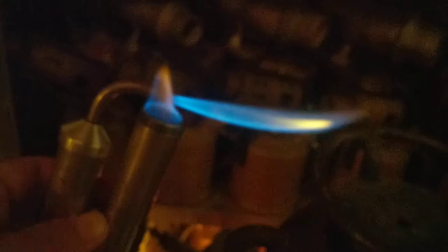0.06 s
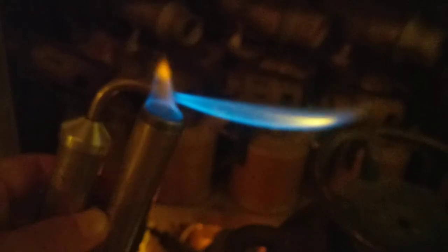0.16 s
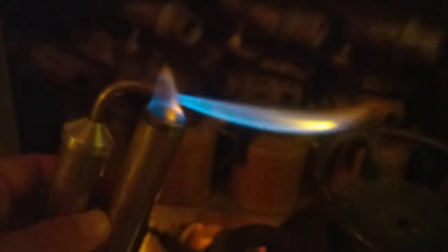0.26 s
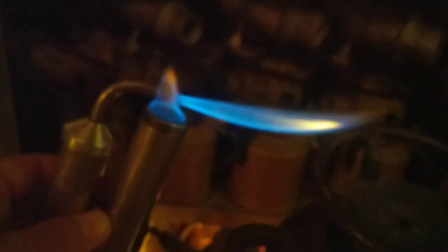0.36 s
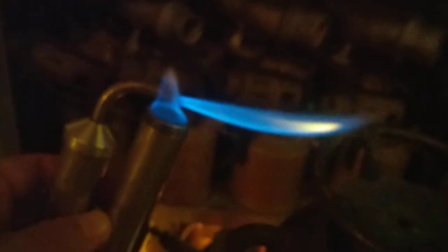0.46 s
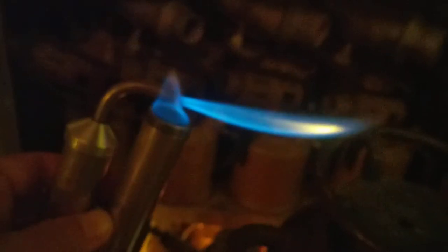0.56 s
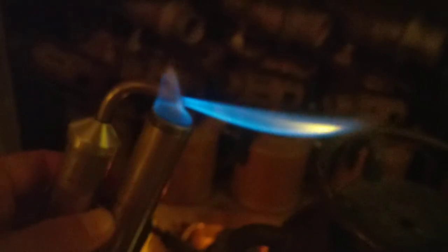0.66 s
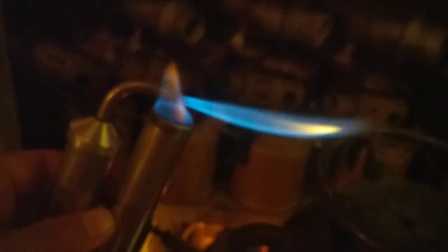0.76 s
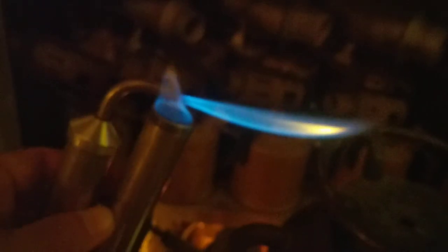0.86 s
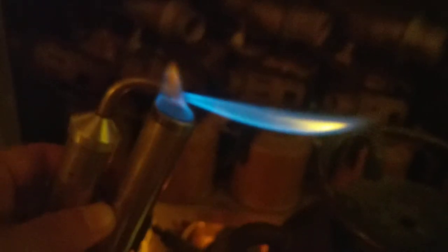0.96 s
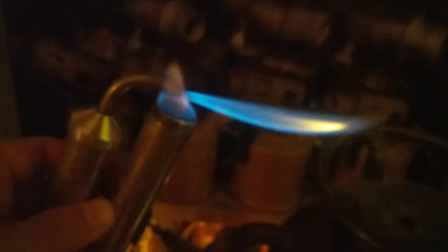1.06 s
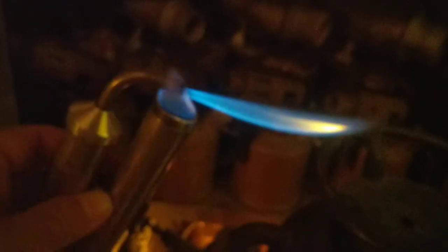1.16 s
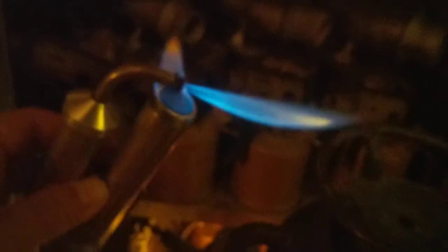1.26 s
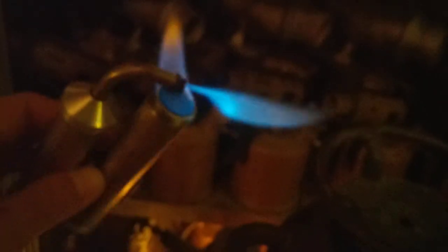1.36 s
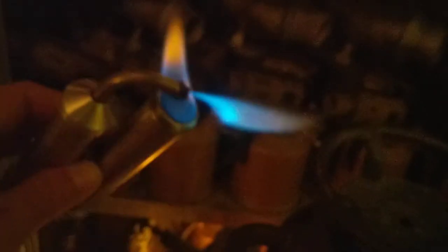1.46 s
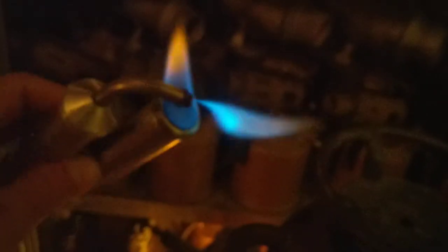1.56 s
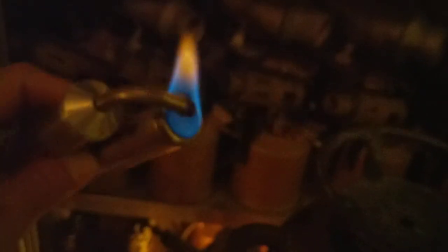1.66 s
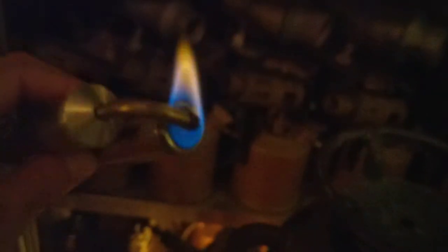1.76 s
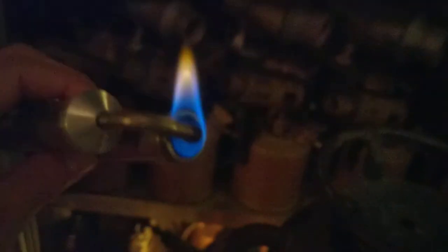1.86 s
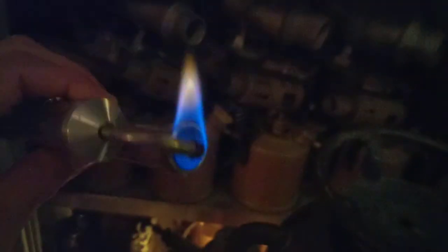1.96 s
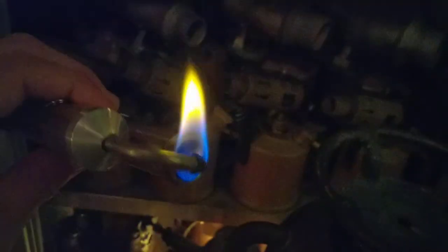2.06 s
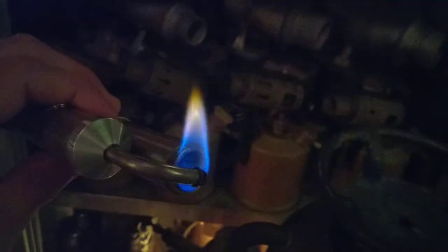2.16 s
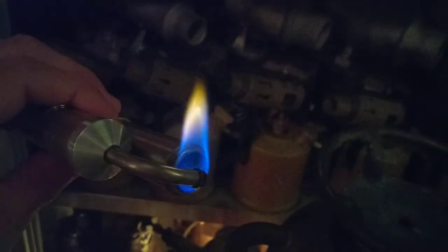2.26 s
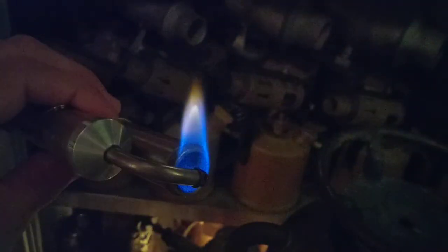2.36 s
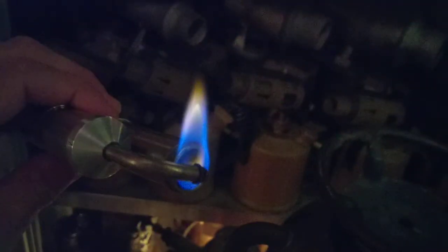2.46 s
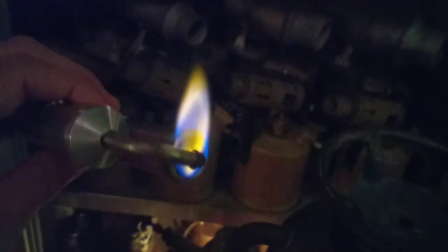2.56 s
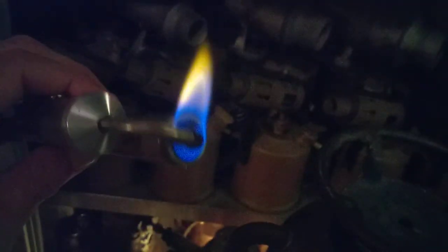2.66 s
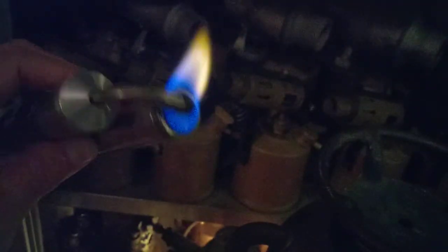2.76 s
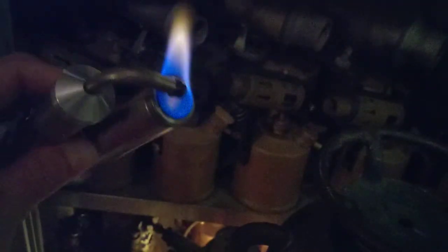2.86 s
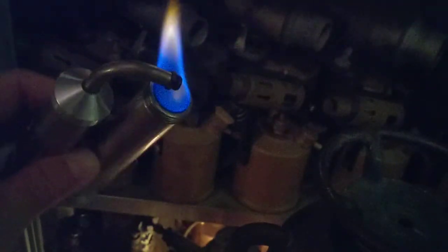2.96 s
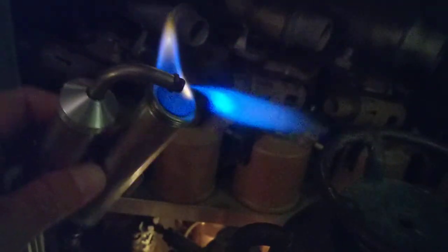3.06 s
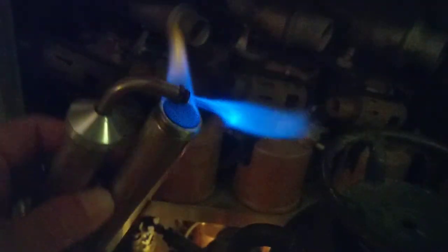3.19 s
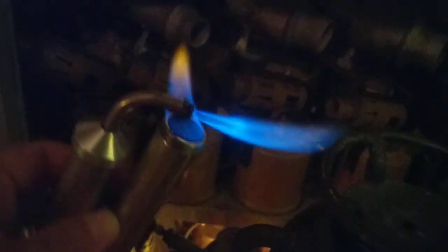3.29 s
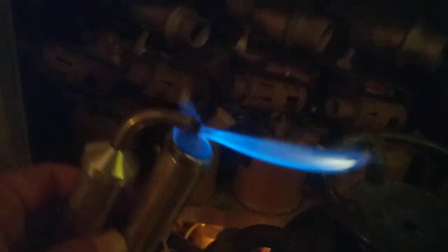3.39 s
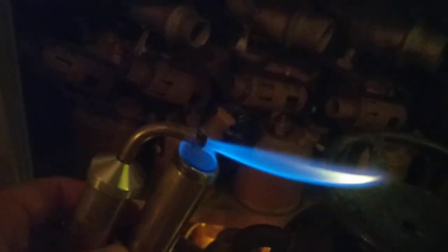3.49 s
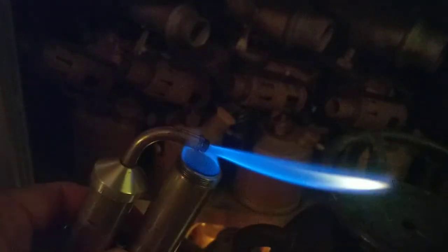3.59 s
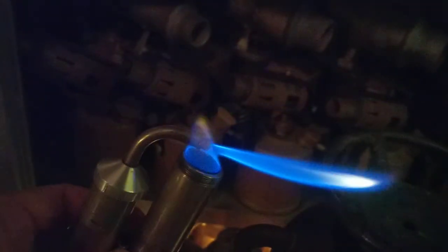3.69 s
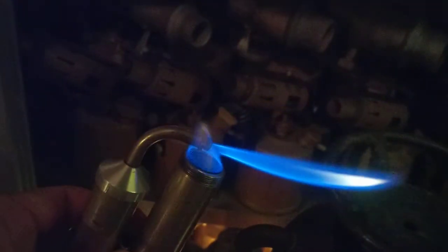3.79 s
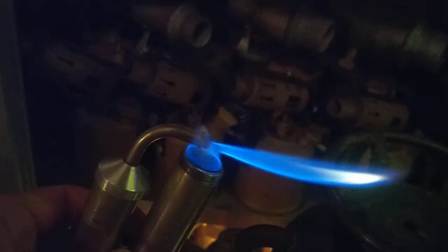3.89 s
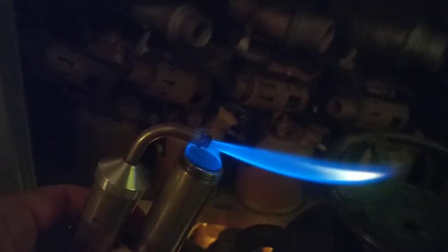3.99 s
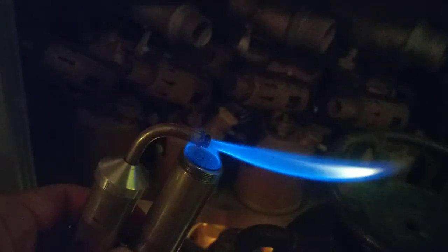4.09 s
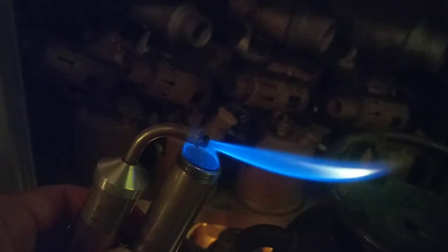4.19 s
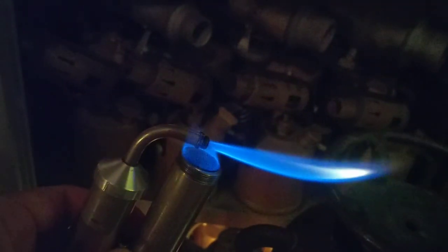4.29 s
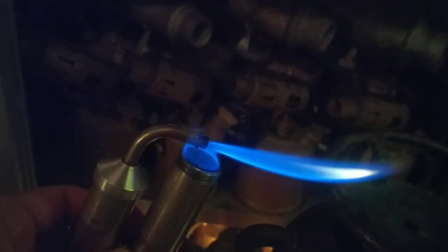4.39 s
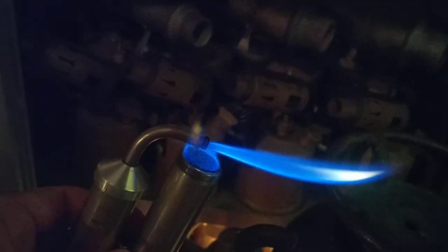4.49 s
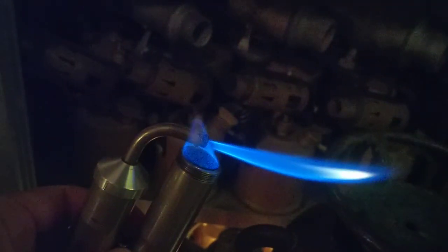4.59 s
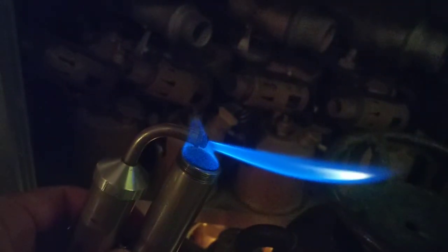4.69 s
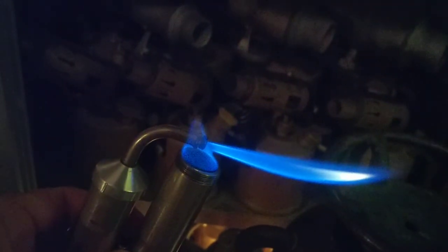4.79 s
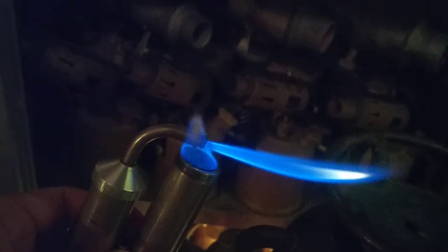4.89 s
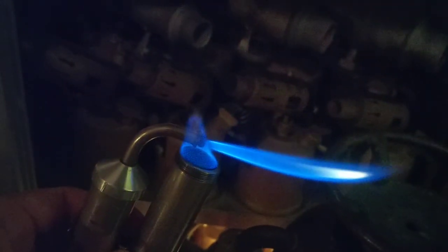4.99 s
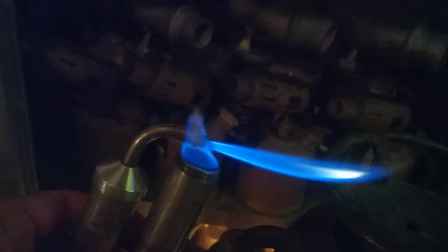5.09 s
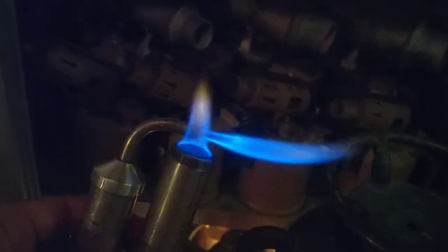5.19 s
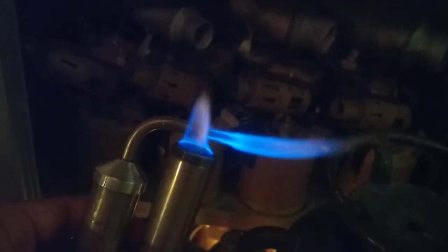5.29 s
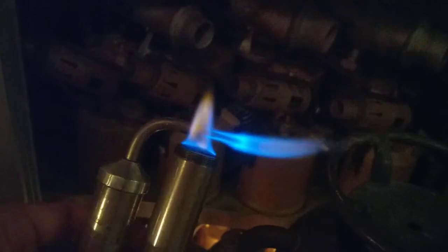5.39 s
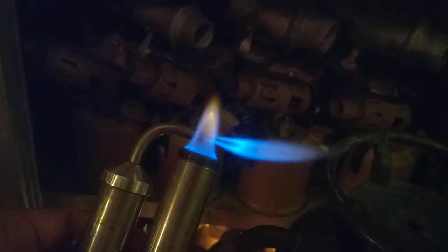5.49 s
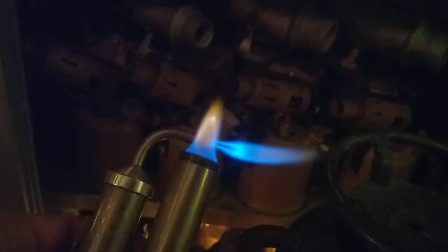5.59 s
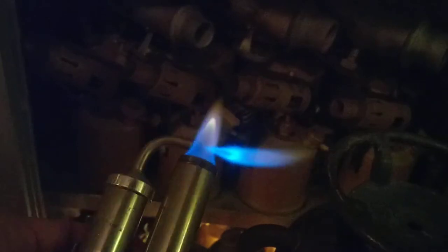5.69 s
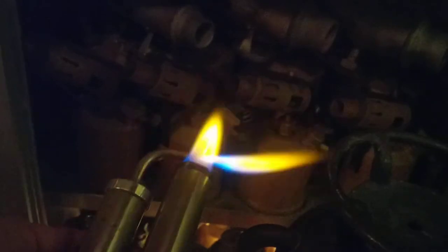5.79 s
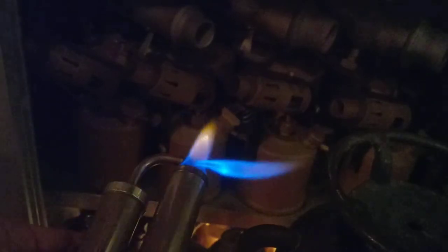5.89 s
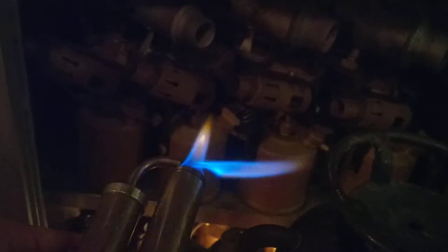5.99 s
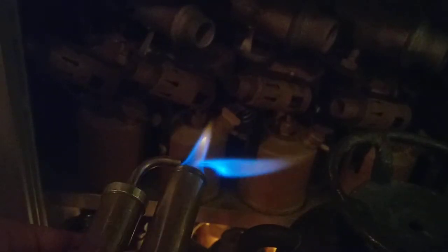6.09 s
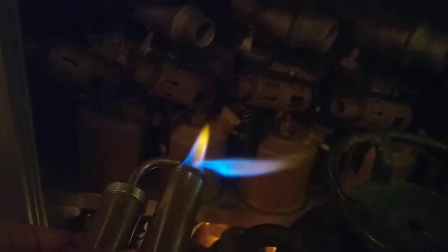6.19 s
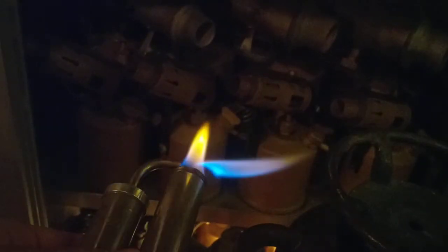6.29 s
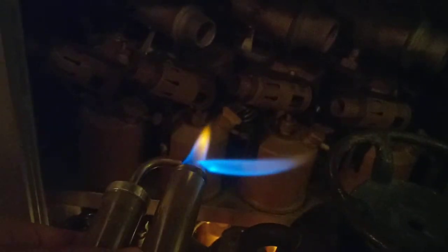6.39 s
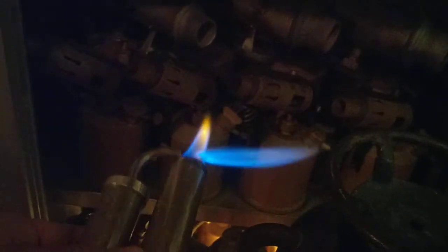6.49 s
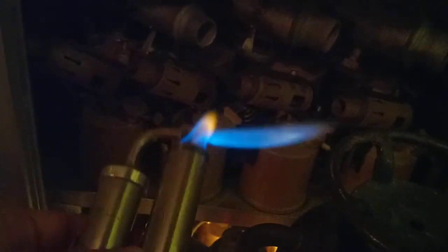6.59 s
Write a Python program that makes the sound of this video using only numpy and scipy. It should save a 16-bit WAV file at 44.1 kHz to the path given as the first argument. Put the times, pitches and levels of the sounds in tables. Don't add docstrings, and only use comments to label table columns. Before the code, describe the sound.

Close stereo sound of a small blow lamp in a quiet workshop, slightly earlier at the left, with short diffuse bench reflections and faint low room air. From 0 to 1.2 s a steady bright hiss lies over a soft flame murmur. At about 1.3 s the flame lifts into a rough, fluttering low-mid roar, strongest from 1.4 to 1.63 s, then cuts off abruptly. Weak hiss thins to near silence by 1.9 s; a loud, very short bright metal tick snaps at 2.04 s. Faint hiss puffs return around 2.5 and 2.95 s with tiny ticks. At 3.08 s it relights with a hard pop and quick gusts until 3.3 s, with a small pop near 3.5 s. Calm hissing continues to 5.2 s. Ragged roars follow, strongest from 5.3 to 5.9 s, with sharp pops at 5.33, 5.86 and 6.23 s and a bright spit at 5.9 s. Shorter gusts weaken toward 6.6 s.

```python
import sys
import numpy as np
from scipy import signal
from scipy.fft import rfft, irfft, next_fast_len
from scipy.io import wavfile
from scipy.ndimage import uniform_filter1d, map_coordinates

SR = 44100
rng = np.random.default_rng(int(sys.argv[2]) if len(sys.argv) > 2 else 0)


def boost_factor(decibels):
    exponent = np.asarray(decibels, float) / 20
    return 10 ** exponent


def wav_record(signal):
    frames = np.transpose(np.atleast_2d(signal))
    bounded = np.clip(frames, -1, 1)
    quanta = np.round(bounded * 32767).astype(np.int16)
    wavfile.write(sys.argv[1], SR, quanta)


N = 293247


def unit(x):
    return x / np.sqrt(np.mean(x ** 2) + 1e-20)


def along(points, hz):
    f, v = np.transpose(points)
    return np.interp(np.log(hz + 1), np.log(f + 1), v)


def curves(rows, t):
    s, *cols = np.transpose(rows)
    return [np.interp(t, s, c) for c in cols]


def power_sum_db(power):
    return 10 * np.log10(power)


def wobble(rate):
    return map_coordinates(rng.standard_normal(int(N * rate / SR) + 4), [np.arange(N) * rate / SR])


def coloured(x, spectrum):
    m = next_fast_len(N + 8192)
    gain = boost_factor(along(spectrum, np.fft.rfftfreq(m, 1 / SR)))
    return irfft(rfft(x, m) * gain, m)[..., :N]


def patchy(patch_db, channels=1):
    z = signal.stft(rng.standard_normal((channels, N)), nperseg=512)[2]
    field = uniform_filter1d(rng.standard_normal(z.shape[1:]), size=6, axis=0)
    field = uniform_filter1d(field, size=10, axis=1)
    return signal.istft(z * boost_factor(patch_db * unit(field)), nperseg=512)[1][:, :N]


def workshop():
    # pitch_hz, level_db
    air_spectrum = [(25, -23), (50, 2), (100, -0.5), (300, -6), (800, -14), (1500, -18.5), (2600, -25),
                    (3600, -26.5), (5000, -21), (7000, -20.5), (9000, -17.5), (10400, -20.5), (11200, -22),
                    (15000, -22.5)]
    a, b, c = coloured(patchy(patch_db=1.4, channels=3), air_spectrum)
    shared = coloured(c, [(40, -2), (150, -2), (400, -12), (1500, -16), (3400, 2.5), (7000, -7), (9000, -16)])
    return boost_factor(-50.0) * unit(np.array([a + shared, b + shared]))


def ticks():
    # start_s, snap_db, pitch_hz, rattle_db
    snaps = [
        (2.0359, -20.5, 7250, -46),
        (2.492, -46, 5000, -60.5),
        (2.868, -50, 7000, -62),
        (5.9068, -44, 8500, -41),
    ]
    out, t = np.zeros(N + SR), np.arange(900) / SR
    for start_s, snap_db, pitch_hz, rattle_db in snaps:
        snap = np.sin(2 * np.pi * pitch_hz * t) * boost_factor(snap_db - 60 * t / 0.00055)
        rattle = np.diff(rng.standard_normal(len(t) + 1)) * boost_factor(rattle_db - 60 * t / 0.036)
        out[round(start_s * SR):][:len(t)] += snap + rattle
    return coloured(out[:N], [(1500, 0), (3000, 2.5), (10000, 2.5), (14000, -5)])


def pops():
    # start_s, peak_db, gas_push (0-1)
    front_dips = [
        (1.51, -36, 0.2),
        (3.0794, -21.5, 0.5),
        (3.487, -40, 0.2),
        (5.325, -33, 0.5),
        (5.697, -48, 0.1),
        (5.761, -47, 0),
        (5.803, -46, 0.2),
        (5.8621, -30, 0.1),
        (6.2251, -26, 0.2),
        (6.498, -36, 0.4),
    ]
    out, t = np.zeros(N + SR), np.arange(-200, 3000) / SR
    dip = 0.22 * np.exp(-(t / 0.0014) ** 2) - 1.47 * np.exp(-(t / 0.00073) ** 2)
    push = (t > 0) * np.sin(2 * np.pi * 65 * t) * boost_factor(-60 * np.abs(t) / 0.088)
    for start_s, peak_db, gas_push in front_dips:
        out[round(start_s * SR) - 200:][:len(t)] += boost_factor(peak_db) * (dip + gas_push * push)
    return out[:N]


def dips(rate, spread_db, top_db):
    draw = rng.random((2, N))
    size_db = np.minimum(-spread_db * np.log(1 - draw[1]), top_db)
    return unit(-1.0 * (draw[0] < rate / SR) * boost_factor(size_db))


def surges(t, fades):
    # start_s (full strength), hold_s, roar_db, fade_db_per_s
    lift_offs = [(1.297, 0.023, -38.5, 300), (1.333, 0.064, -33, 300), (1.431, .2, -30, 900),
                 (3.08, 0.054, -35.5, 174), (3.183, 0.069, -34.5, 200), (3.291, 0.027, -35, 150),
                 (3.477, 0.0077, -49, 312), (5.197, 0.016, -34, 262), (5.324, 0.17, -34.5, 300),
                 (5.498, 0.1, -33.5, 300), (5.636, 0.26, -34, 27), (6.044, .04, -39.5, 200),
                 (6.128, 0.098, -35, 60), (6.324, 0.04, -38, 120), (6.46, 0.052, -39.5, 300.5),
                 (6.563, 0.074, -48.5, 196)]
    rise_db_per_s, relight_s, catch_s = 606, 3.075, 0.06
    power = 0
    for start_s, hold_s, roar_db, fade_db_per_s in lift_offs:
        swell_db = rise_db_per_s * np.clip(start_s - t, 0, 1)
        fade_db = fades * fade_db_per_s * np.clip(t - start_s - hold_s, 0, 1)
        power = power + boost_factor(2 * (roar_db - swell_db - fade_db))
    return power * ((t < relight_s - catch_s) | (t > relight_s))


def flame():
    # time_s, hiss_db (nozzle pressure), murmur_db (seated flame)
    jet = [(0, -53, -51), (1.27, -54, -53.5), (1.63, -49.5, -49), (1.68, -57.5, -65), (1.85, -59, -65.5),
           (1.93, -78, -73), (2.3, -76, -73), (2.48, -58, -75), (2.72, -68, -71), (2.95, -58.5, -67),
           (3.06, -57, -68), (3.08, -53, -56), (3.5, -55, -55.5), (4.4, -54, -55.5), (5.05, -58.5, -56),
           (5.9, -57.5, -48), (6.2, -55.5, -54), (6.65, -66.5, -73)]
    # pitch_hz, level_db (per Hz)
    roar_spectrum = [(30, -36), (80, -12), (150, -8), (280, -3), (450, -3.5), (700, -7.5), (1000, -10.5),
                     (1500, -17.5), (3000, -31.5), (6000, -104)]
    body_spectrum = [(300, -38), (800, 2.5), (1400, 1), (2500, -3.5), (4000, -2), (5500, -2.5), (7500, -10),
                     (10000, -20)]
    hiss_spectrum = [(2500, -30), (4500, -1), (6200, -7.5), (8000, -4.5), (10200, -7), (11500, -14.5),
                     (14000, -19.5), (16000, -25)]
    t = np.arange(N) / SR
    pressure_db, seated_db = curves(jet, t)
    low = surges(t, fades=1)
    high = surges(t, fades=2.2)
    roar_db = power_sum_db(boost_factor(2 * seated_db) + low)
    body_db = power_sum_db(boost_factor(2 * (seated_db - 3)) + high * boost_factor(2 * -17.5))
    hiss_db = power_sum_db(boost_factor(2 * pressure_db) + high * boost_factor(2 * -22))
    lifted = np.clip((roar_db + 52.5) / 8, 0, 1) * 0.83
    front = dips(rate=800, spread_db=3, top_db=8)
    flutter = lifted * (0.7 * wobble(9) + 0.8 * wobble(40))

    def blend(share, spectrum):
        pockets = unit(coloured(front, spectrum))
        smooth = unit(coloured(patchy(patch_db=1.0)[0], spectrum))
        return share * pockets + np.sqrt(1 - share ** 2) * smooth

    roar = boost_factor(roar_db + 0.5 + flutter) * blend(lifted, roar_spectrum)
    body_db = body_db + 5.5 + 0.8 * flutter + 1.3 * lifted * wobble(20)
    body = boost_factor(body_db) * blend(0.59 * lifted, body_spectrum)
    hiss_db = hiss_db + 3.5 + 1.1 * flutter + 0.76 * wobble(10.0)
    hiss = boost_factor(hiss_db) * unit(coloured(patchy(patch_db=0.26)[0], hiss_spectrum))
    return roar + body + hiss


def bench(x, t60, count):
    t, step = np.arange(SR // 8) / SR, N // count + 1
    padded, out = np.pad(x, (step, 2 * step)), np.zeros((2, N + 4 * step + SR))
    window = np.sin(np.pi * np.arange(2 * step) / (2 * step))
    for k in range(count + 1):
        piece = padded[k * step:][:2 * step] * window
        tail = rng.standard_normal((2, len(t))) * boost_factor(-60 * t / t60)
        tail = tail / np.linalg.norm(tail, axis=1, keepdims=True)
        echo = signal.fftconvolve(piece[None], tail, axes=1)
        out[:, k * step:][:, :echo.shape[1]] += echo
    return out[:, step:step + N]


def humps(table, hz):
    return sum(db * np.exp(-((hz - c) / w) ** 2) for c, w, db in table)[:, None]


def ports(lamp, close, air):
    # time_s, nozzle_turn (0-1), bass_tilt_db (per octave, flame size), left_minus_right_db
    pose = [(0, 0, 1, 1), (1.3, 0.6, -0.13, 0.5), (2.5, 0.7, 5, 0.5), (3.2, 0.7, 1, 1), (3.7, 0.8, 1, 0),
            (4.3, 1, 1.5, 0), (5.1, 0.4, 0.8, 0), (5.6, 0.35, 0, 0), (6, 0.35, 1.5, 0.5), (6.65, 0, -1, -1)]
    # time_s, lead_us
    lead_path = [(0, 144), (1.2, 144), (1.55, 123), (1.8, 138), (3, 140), (3.2, 124), (3.5, 128), (5, 127),
                 (5.5, 117), (6, 105), (6.65, 112)]
    # pitch_hz, angle_rad
    twist = [(1500, 0), (1850, .2), (2150, 1.1), (2450, -.1), (2800, -.3), (3300, .35), (3800, .9),
             (4500, 1.3), (5100, .2), (5500, 0)]
    # pitch_hz, likeness (0-1)
    direct = [(100, 0.98), (500, 1), (1200, 0.85), (2100, 0.72), (2700, 0.6), (3400, .62), (4400, 0.72),
              (5000, 0.2), (6000, 0.6), (8000, 0.2), (9000, 0)]
    # pitch_hz, width_hz, level_db
    whistles = [
        (6400, 230, 4.5),
        (7900, 570, 6.5),
    ]
    # pitch_hz, width_hz, level_db
    surfaces = [(577, 90, 5), (785, 29, 4.5), (1068, 12, 10), (1220, 24, 6), (1447, 60, 4.5), (1662, 39, 6),
                (2520, 86, 3), (3154, 360, 0.5), (4630, 270, -1)]
    # pitch_hz, level_db
    left_colour = [(600, -3), (1400, -7), (1950, -3), (2500, 8), (3000, 3.5), (4000, -1), (4600, -0.5),
                   (5500, -1.5), (6000, 1), (7000, 5.5), (8000, 3), (10000, 3.5), (12000, -4)]
    right_colour = [(600, -2), (950, -4), (1100, -4), (1400, -6.5), (2000, 1.5), (2650, 5), (3200, 6.5),
                    (4200, 1), (5050, -16), (5800, -2), (8000, -2.5), (8600, -4), (10000, -2),
                    (12000, -6.5)]
    echoes = bench(lamp + 0.4 * close, t60=0.14, count=50)
    hz, t, heard = signal.stft(np.vstack([lamp, close, echoes, air]), SR, nperseg=1024)
    near, tick, echo_pair, air_pair = heard[0], heard[1], heard[2:4], heard[4:]
    (lead_us,), (turn, tilt_db, pan_db) = curves(lead_path, t), curves(pose, t)
    lead = 2 * np.pi * hz[:, None] * lead_us / 10 ** 6
    lead = lead + along(twist, hz)[:, None] * np.clip((lead_us - 105) / 39, 0, 1)
    alike = np.clip(along(direct, hz), 0, 1)[:, None]
    tilt = tilt_db * np.log2(np.clip(hz, 150, 1200) / 480)[:, None]
    colour = boost_factor(humps(whistles, hz) * turn + humps(surfaces, hz) - tilt)
    left, right = colour * (np.sqrt(alike) * near + np.sqrt(1 - alike) * echo_pair) + tick + air_pair
    left = left * boost_factor(along(left_colour, hz)[:, None] + pan_db / 2) * np.exp(0.5j * lead)
    right = right * boost_factor(along(right_colour, hz)[:, None] - pan_db / 2) * np.exp(-0.5j * lead)
    return signal.istft(np.array([left, right]), SR, nperseg=1024)[1][:, :N]


def scene():
    return ports(flame() + pops(), ticks(), workshop())


def starved(strong, weak, hz, gap_db, ranges_hz):
    def band(z):
        power = np.add.reduceat(np.abs(z) ** 2, np.arange(0, len(hz), 8))
        return np.repeat(power, 8, axis=0)[:len(hz)]

    in_range = np.any([(hz > lo) & (hz < hi) for lo, hi in ranges_hz], axis=0)
    return weak * ~((band(weak) < band(strong) * boost_factor(-2 * gap_db)) & in_range[:, None])


def low_pass(x):
    return signal.sosfilt(signal.butter(12, 14300, fs=SR, output="sos"), x)


def record(dry):
    hz, _, (left, right) = signal.stft(dry, SR, nperseg=2048)
    right = starved(left, right, hz, gap_db=11, ranges_hz=[(4800, 5400)])
    mid, side = (left + right) / 2, (left - right) / 2
    mid = starved(side, mid, hz, gap_db=5.5, ranges_hz=[(2060, 2240), (3000, 4700)])
    treble = [(10800, 14300)]
    mid, side = starved(side, mid, hz, 3, treble), starved(mid, side, hz, 3, treble)
    mix = signal.istft(np.array([mid + side, mid - side]), SR, nperseg=2048)[1][:, :N]
    return low_pass(mix)


dry = scene()
out = record(dry)
wav_record(out)
```